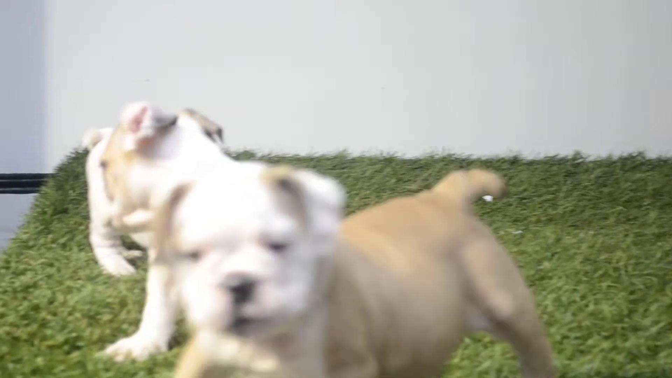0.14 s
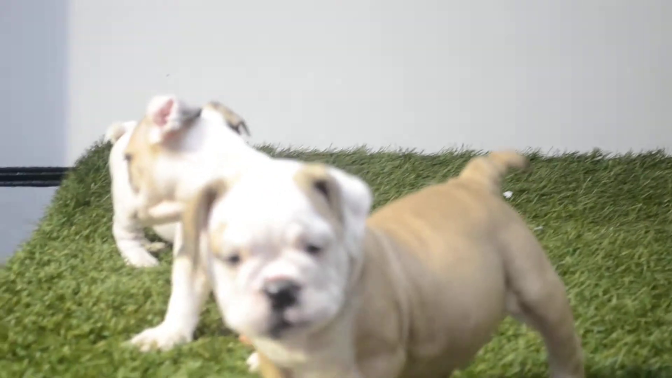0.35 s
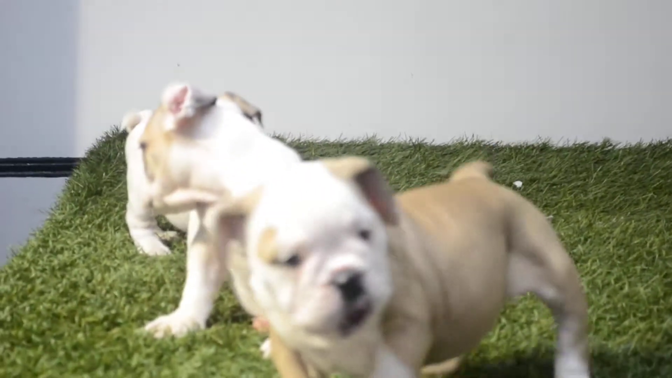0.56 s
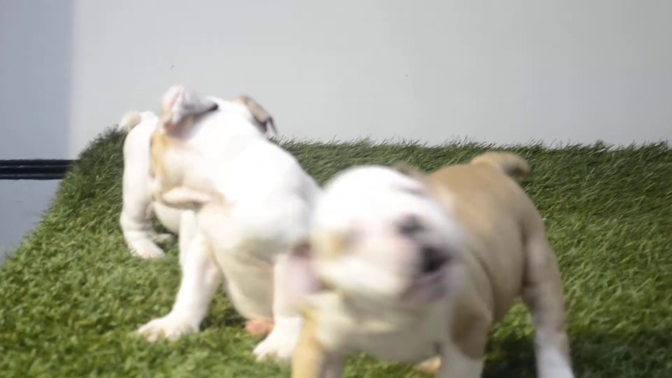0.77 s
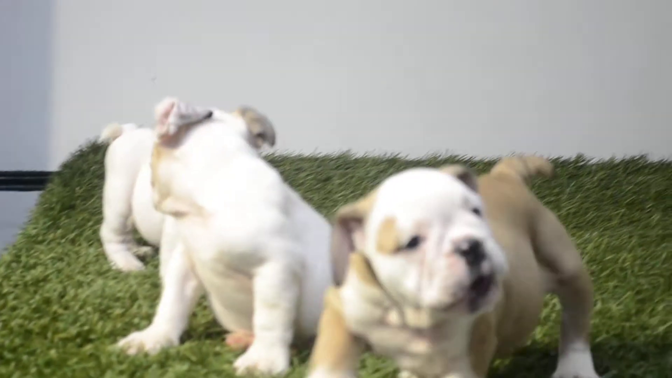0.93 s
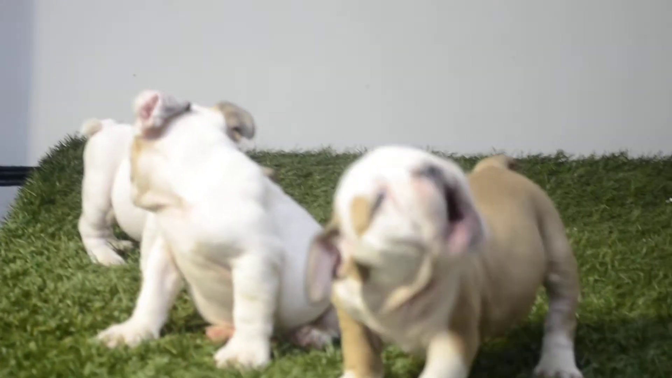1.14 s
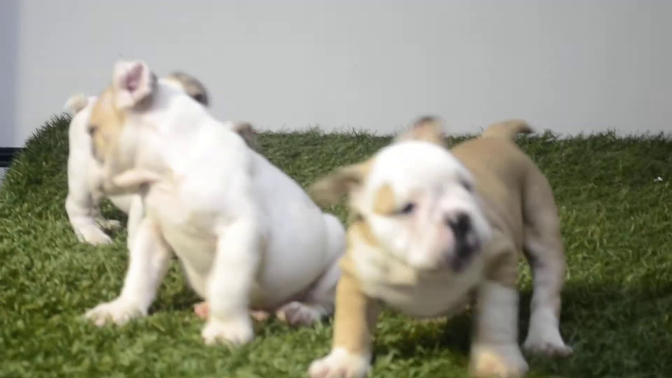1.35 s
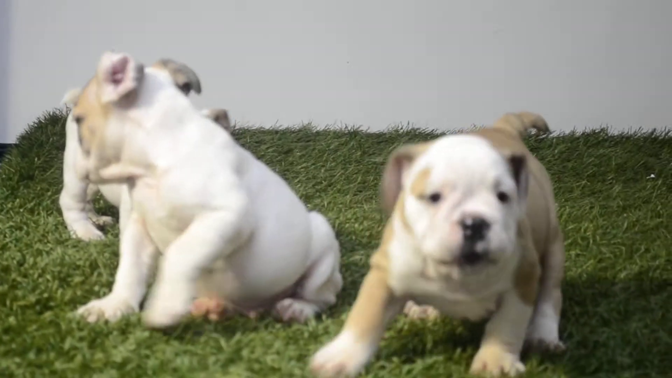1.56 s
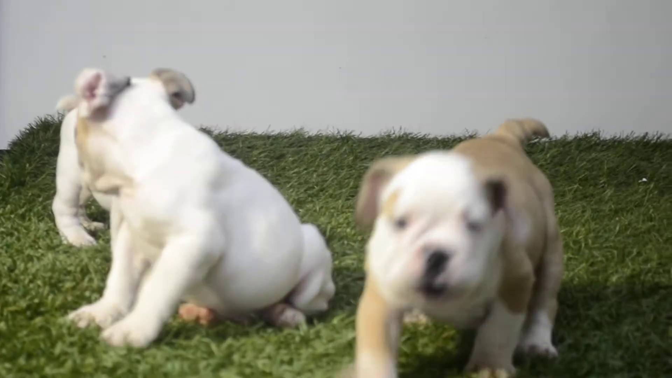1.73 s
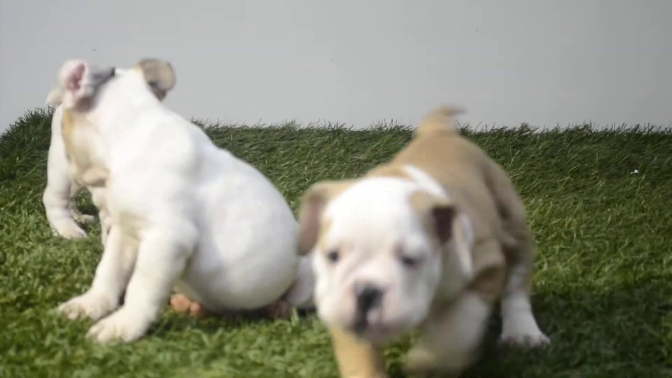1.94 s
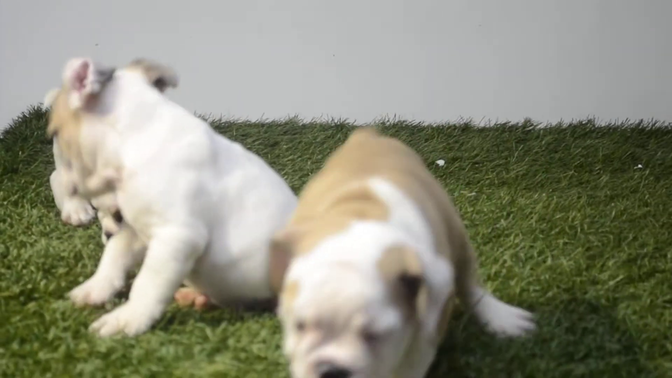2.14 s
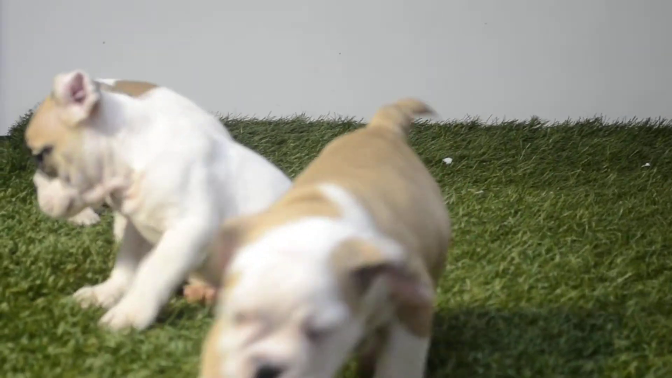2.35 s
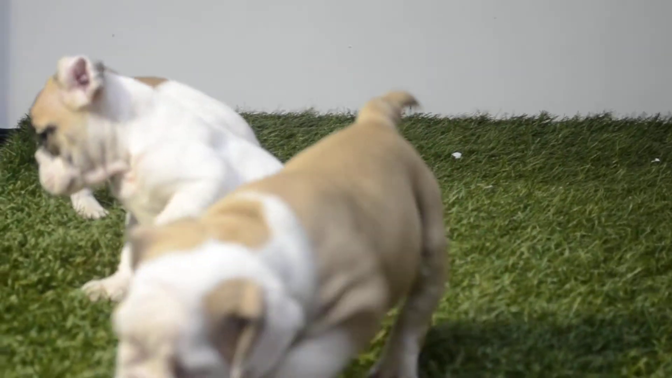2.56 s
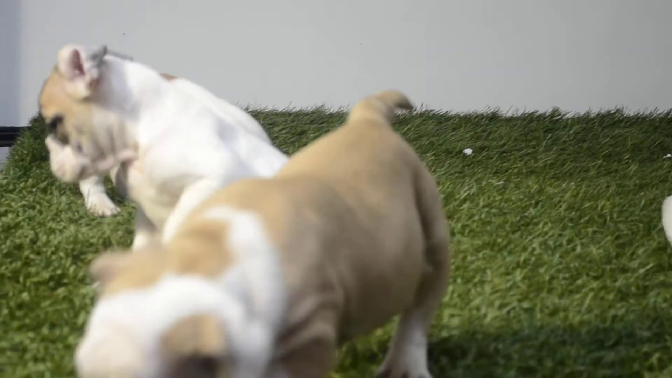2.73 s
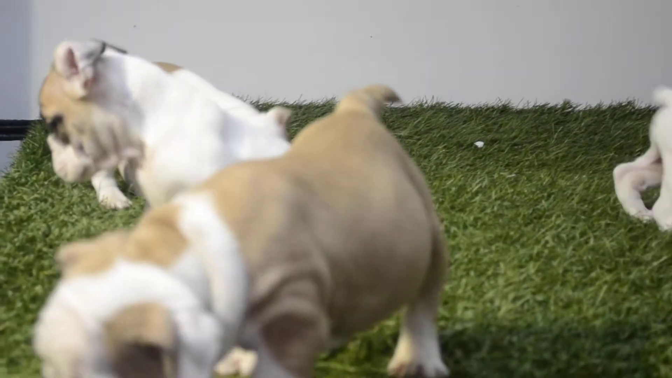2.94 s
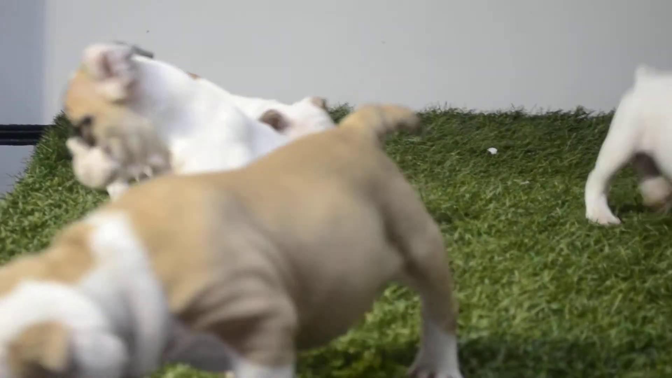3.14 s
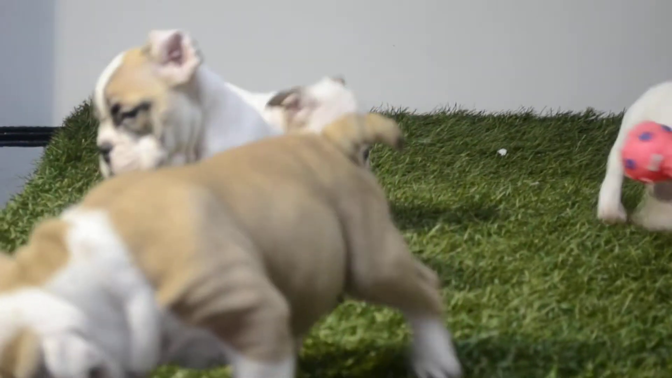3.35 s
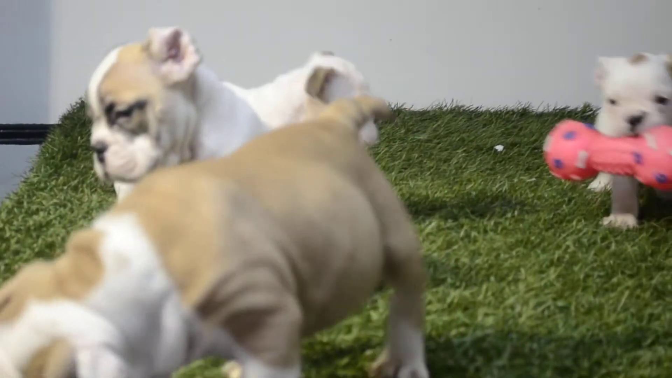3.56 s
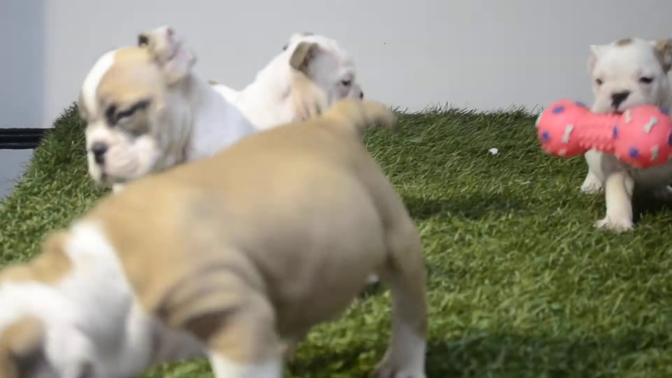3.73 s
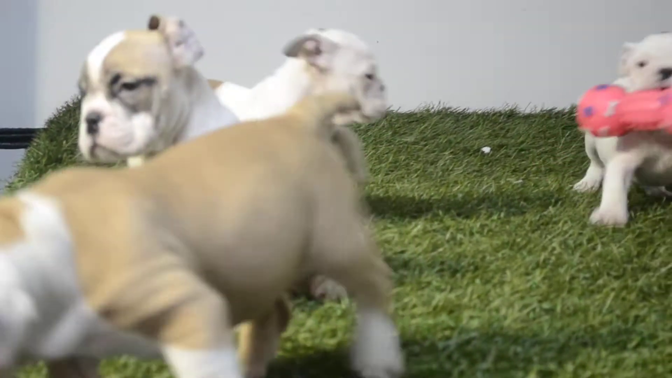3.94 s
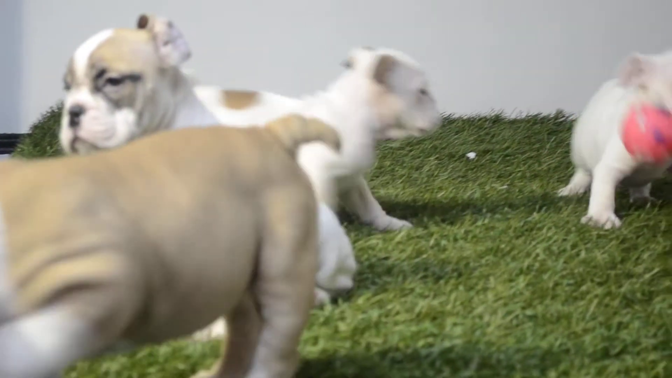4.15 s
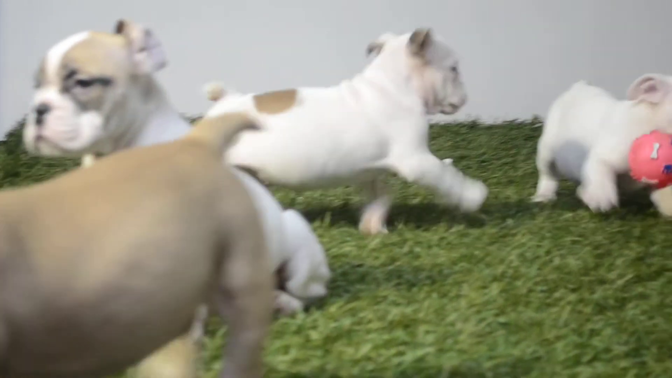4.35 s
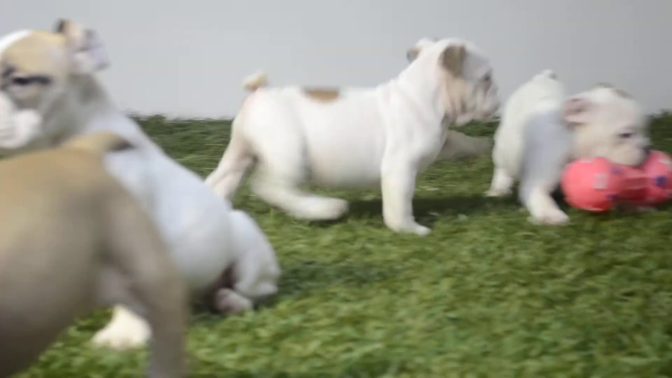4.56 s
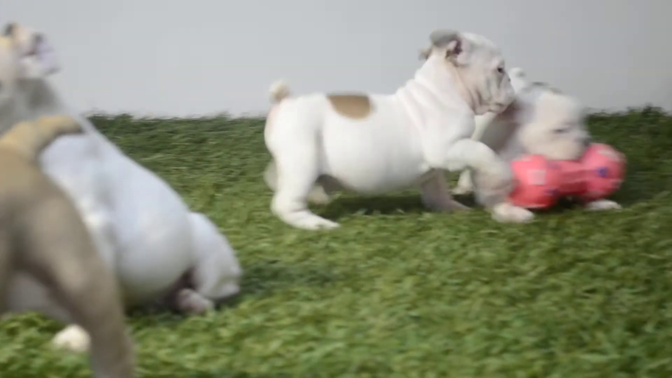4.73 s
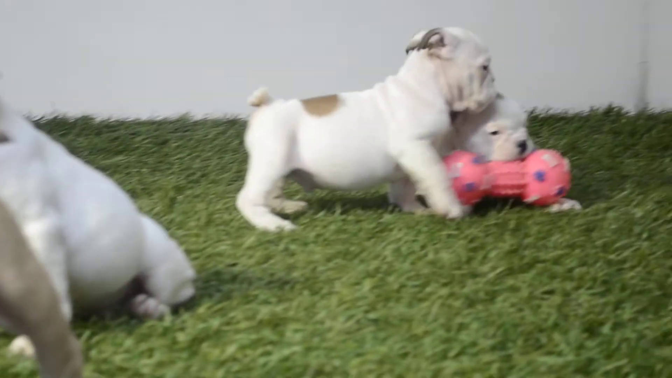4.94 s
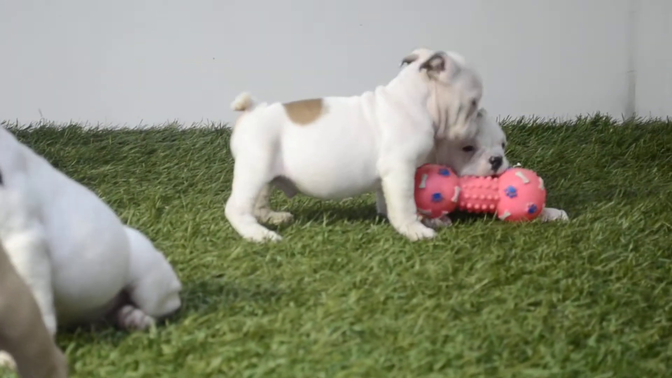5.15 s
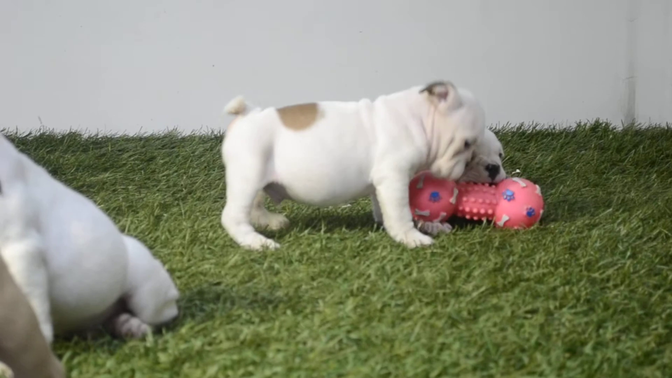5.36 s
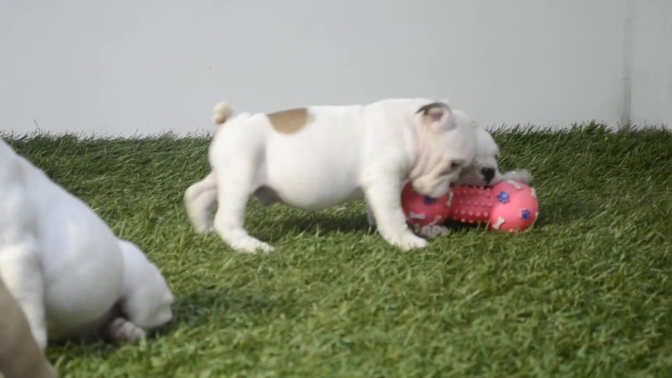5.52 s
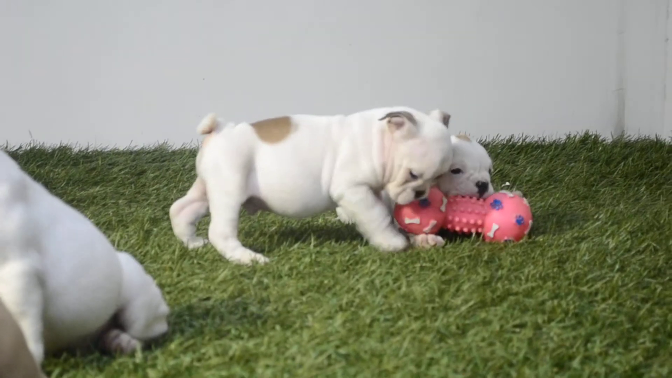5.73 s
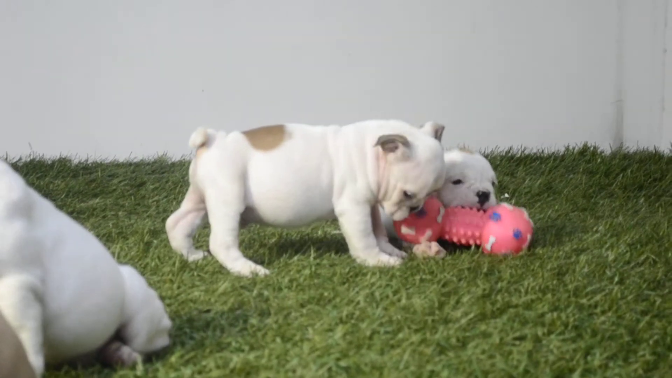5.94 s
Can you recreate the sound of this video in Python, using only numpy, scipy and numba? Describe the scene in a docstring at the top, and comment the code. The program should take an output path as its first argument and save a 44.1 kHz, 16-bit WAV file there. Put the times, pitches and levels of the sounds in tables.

```python
"""In a bare, echoing room, bulldog puppies play on artificial turf.
One gives two shrill hoarse yaps, a growling bark, a grumble and a last yap that falls as the mouth
closes. Each call is a string of uneven pulses from the vocal folds that make the throat ring.
Between the calls, air snuffles and whistles through short noses, and paws thud and brush the
plastic blades. Under it all lies a steady hiss with a faint whine."""
import sys
import numpy as np
from scipy import signal
from scipy.fft import rfft, irfft, next_fast_len
from scipy.io import wavfile
from scipy.ndimage import uniform_filter1d
from numba import njit

SR = 44100
rng = np.random.default_rng(int(sys.argv[2]) if len(sys.argv) > 2 else 0)


def to_wav(s):
    """Save 16-bit WAV."""
    ch = np.atleast_2d(s).T  # columns
    pcm = np.round(np.clip(ch, -1, 1) * 32767)  # PCM
    wavfile.write(sys.argv[1], SR, pcm.astype(np.int16))


N = 268569
TIME = np.arange(N) / SR


def yaps():
    """Three shrill calls that burst out at their loudest and soon turn hoarse."""
    # one breath per yap: (start [s], level [dB], attack [s], hold [s], sag over the hold [dB],
    # throb [dB], base pitch [Hz], roughness [0-1], mouth opening at the start [factor],
    # mouth opening at the end [factor], time the mouth takes to move [s])
    breaths = [(.656, -16.5, 0.016, 0.17, 4, 3.5, 536.7, 0.18, 1.23, 0.96, .05),
               (1.066, -16.5, .016, 0.18, 5, 5, 547.4, 0.34, 1.0, 0.97, 0.088),
               (4.287, -16.5, .027, 0.082, 3.5, 1.65, 328.6, .08, 1.24, .88, .061)]
    # where the throat rings in each yap: (centre [Hz], width [Hz], gain [dB], follows mouth [power])
    first_throat = [(1064, 314, 4.5, 0.82), (1244, 366, 2.5, 0.12), (2146, 240, 4.5, 0.78),
                    (2070, 380, -5.5, 0.34), (2995, 470, 2, 0.6)]
    second_throat = [(1147, 244, -1, 0.38), (1570, 260, -7, 0.2), (2223, 550, -10, 4.4),
                     (3150, 236, -7.5, 0.39)]
    last_throat = [(550, 220, -15, .5), (950, 430, -2.5, 1.3), (1460, 530, -9, -0.66),
                   (2694, 220, -4, 1.39), (3170, 425, -4, 0.89), (3860, 1100, -24, 0.35)]
    first, second, last = (
        breath(row, release_db_per_s=448, accent_db=4, accent_s=.052, roughens_per_s=1.6)
        for row in breaths)
    return (call(first, first_throat, low_cut_hz=650, jitter=.13)
            + call(second, second_throat, low_cut_hz=590, jitter=.12)
            + call(last, last_throat, low_cut_hz=376, jitter=.13))


def growls():
    """Slower, very uneven pulses: a grunt, a low growl, the bark it breaks into and a long grumble."""
    # one breath for each of the four, with the same columns as in yaps()
    breaths = [(1.596, -22, 0.0099, 0.013, 9, -1, 286, 0.28, 0.75, 0.77, 0.031),
               (1.64, -36.5, 0.026, 0.044, -7, 3.5, 144.4, 0.61, 0.81, .8, 0.11),
               (1.72, -16.5, .056, .076, 0, 1.7, 200.1, .48, .84, 1.03, .075),
               (2.208, -27, .041, 0.36, 12, 3.5, 101.6, 0.59, 1.254, .66, .19)]
    # where the throat rings: (centre [Hz], width [Hz], gain [dB], follows mouth [power])
    growl_throat = [(393, 890, -16, 0.96), (1010, 550, 2, 0.96), (1616, 490, -5.5, 1),
                    (2470, 710, -4.5, 0.22), (3520, 300, -3, 0.67)]
    grumble_throat = [(420, 740, -11.5, 0.95), (767, 280, -2, 0.69), (1125, 220, 0.5, 0.93),
                      (2020, 730, -10, 0.098), (3010, 2300, -15.5, 0.87)]
    *barks, grumble = (
        breath(row, release_db_per_s=897, accent_db=-3.5, accent_s=.016, roughens_per_s=.8)
        for row in breaths)
    barking = sum(call(bark, growl_throat, low_cut_hz=140, jitter=.52) for bark in barks)
    return barking + call(grumble, grumble_throat, low_cut_hz=63, jitter=.4)


def breath(row, release_db_per_s, accent_db, accent_s, roughens_per_s, throb_hz=26.37, slide_s=.03):
    """One push of breath swells, throbs and fades; the pitch follows the mouth and the voice frays."""
    start, db, attack, hold, sag_db, throb_db, pitch_hz, rough, mouth_from, mouth_to, move_s = row
    end = start + attack + hold + 40 / release_db_per_s   # until the release has dropped 40 dB
    span = np.flatnonzero((TIME >= start) & (TIME < end))
    age = TIME[span] - start
    held = age - attack
    throb = 2 * np.abs(np.cos(np.pi * throb_hz * np.maximum(held, 0))) ** 3.4   # short bursts
    throb -= throb.mean()
    level_db = db + 16 * np.minimum(held / attack, 0)   # the climb of the attack
    level_db += accent_db * np.exp(-np.abs(held / accent_s)) + throb_db * throb
    level_db -= sag_db * np.clip(held / hold, 0, 1) + release_db_per_s * np.maximum(held - hold, 0)
    mouth = mouth_to + (mouth_from - mouth_to) * np.exp(-(age / move_s) ** 2)
    slide = .5 + .5 * np.minimum(age / slide_s, 1) ** 2   # up from half the pitch
    # each throb lifts the pitch a little and clears the voice
    pitch = pitch_hz * slide * mouth ** .75 * (1 + .015 * throb)
    rough = (rough + (1 - rough) * roughens_per_s * age) * (1 - .3 * throb)
    return span, level_db, pitch, np.clip(rough, 0, 1), mouth


def call(motion, throat, low_cut_hz, jitter):
    """Uneven pulses of the vocal folds, each with a puff of air, ring the throat as the mouth moves."""
    # how the voice carries from muzzle to listener: (frequency [Hz], gain [dB])
    voice_colour = [(60, 0.5), (200, 6), (1000, 0), (3400, 1.5), (3750, -11.5), (4400, -6.5), (7000, -18),
                    (10000, -16), (12000, -32)]
    span, level_db, pitch, rough, mouth = motion
    cycles = np.cumsum(pitch * np.exp(jitter * rough * wander(350)[span])) / SR
    pulses = np.diff(np.floor(cycles), prepend=0) * from_db(7 * rough * wander(300)[span])
    puffs = rng.standard_normal(N)[span] * np.exp(-2 * (cycles % 1))
    source = np.sqrt(1 - rough) * rms_one(pulses) + np.sqrt(rough) * rms_one(puffs)
    voice = 0
    for hz, width, db, follows in throat:
        centre = hz * mouth ** follows
        voice += from_db(db) * resonate(resonate(source, centre, width), centre, width)
    # a small muzzle gives off little bass
    voice = signal.sosfilt(signal.butter(4, low_cut_hz, "high", fs=SR, output="sos"), voice)
    voice = coloured(voice, voice_colour)
    # even out the loudness, so that the breath sets it
    voice /= np.sqrt(np.abs(uniform_filter1d(voice ** 2, size=600)) + 1e-12)
    # fade in over the first two pulses, so that the call starts without a click
    fade_in = np.minimum(cycles / 2, 1)
    out = np.zeros(N)
    out[span] = voice * from_db(level_db) * fade_in
    return out


def snuffles():
    """Air forced through a short nose, fluttering a little in its soft folds."""
    # puffs of air: (peak time [s], level [dB], rise [s], fall [s], nose hiss against the air [dB])
    puffs = [(1.018, -23.5, 0.015, 0.072, -17.5), (2.032, -37.5, 0.03, 0.016, -12.5),
             (2.25, -39.5, .21, 0.17, -13.5), (3.111, -29, 0.049, 0.043, -15.5),
             (3.88, -35.5, 0.046, 0.022, -10.5), (4.21, -38.5, .051, 0.039, -15),
             (5.053, -22.5, 0.0068, 0.061, -15), (5.235, -38.5, .005, 0.021, -1),
             (5.73, -41, .032, 0.084, -9.5), (6.05, -43, .064, .055, -9)]
    # tone of the rushing air and of the high nose hiss: (frequency [Hz], gain [dB])
    air_colour = [(30, -44), (150, -17), (300, -9), (700, -13), (1000, -2), (1400, -12.5), (2000, 3.5),
                  (2700, 2.5), (3400, 0), (4300, -20.5), (7000, -41.5), (12000, -66.5)]
    nose_colour = [(1000, -24), (3000, 3.5), (4200, 13), (6600, -1.5), (8000, -12.5), (10000, -21),
                   (11200, -38), (13000, -61)]
    air = rms_one(coloured(rng.standard_normal(N), air_colour))
    nose = rms_one(coloured(rng.standard_normal(N), nose_colour))
    blown = sum(from_db(db) * swell(s, rise, fall) * (air + from_db(nose_db) * nose)
                for s, db, rise, fall, nose_db in puffs)
    return blown * from_db(1.2 * wander(130))


def nose_whistle(width_hz=45):
    """Air sings in the nostrils: one thin whistle with weaker tones above it."""
    # the whistle: (time [s], level [dB], pitch [Hz])
    whistle_curve = [(2.1, -88, 3190), (2.14, -43, 3190), (2.27, -43, 3144), (2.315, -27, 3150),
                     (2.345, -41, 3080), (2.42, -73, 3170)]
    # the weaker tones: (pitch [Hz], peak level [dB])
    upper_tones = [(3740, -42), (4640, -52.5), (5500, -61), (6900, -67)]
    air = rng.standard_normal(N)
    tones = 0
    for hz, db in upper_tones:
        centre = np.full(N, float(hz))
        tones += from_db(db) * rms_one(resonate(resonate(air, centre, width_hz), centre, width_hz))
    return tones * swell(2.36, rise=.19, fall=.086) + trembling_tone(whistle_curve, waver=.015)


def squeak():
    """A brief high squeak that dies away."""
    # its course: (time [s], level [dB], pitch [Hz])
    squeak_curve = [(0, -31.5, 1740), (.02, -36.5, 1817), (.07, -60, 1700)]
    return trembling_tone(squeak_curve, waver=.011)


def paws(rise_s=.0062):
    """Each step on the turf gives a dull thud and a crackle of plastic blades."""
    # the firmer steps: (time [s], level [dB], thud pitch [Hz], fall [s])
    firm_steps = [(.005, -40, 1070, .049), (.095, -40, 560, 0.036), (.135, -45, 910, 0.031),
                  (.2, -44.5, 258, 0.13), (.56, -39.5, 330, .015), (1.54, -37, 950, 0.019),
                  (2.57, -36, 238, 0.051), (2.978, -39, 970, 0.035), (3.09, -41.5, 1034, 0.1),
                  (3.413, -41, 214, 0.028), (4.129, -49, 950, 0.011), (4.24, -48.5, 210, 0.085),
                  (4.956, -36, 1740, 0.075), (5.204, -39.5, 525, 0.11), (5.772, -40.5, 233, 0.024)]
    # tone of the blades: (frequency [Hz], gain [dB])
    blade_colour = [(40, -42), (300, 2), (1000, -7.5), (3200, -0.5), (4500, -15.5), (8000, -39.5),
                    (12000, -53)]
    crackle = rng.standard_normal(N) * from_db(10 * wander(700))
    blades = rms_one(coloured(crackle, blade_colour))
    thud_band = signal.butter(2, [130, 2000], "band", fs=SR, output="sos")
    push = signal.sosfilt(thud_band, rng.standard_normal(N))
    out = np.zeros(N)
    for s, db, hz, fall in list(firm_steps) + light_steps():
        span = slice(max(int(s * SR) - SR // 20, 0), int(s * SR) + SR // 2)
        centre = np.full(len(push[span]), float(hz))
        thud = rms_one(resonate(push[span], centre, .38 * hz))
        rustle = from_db(-3 + 3 * np.log2(hz / 1000)) * blades[span]   # low, flat steps crackle less
        out[span] += from_db(db) * swell(s, rise_s, fall, TIME[span]) * (thud + rustle)
    return out


def light_steps(steps_per_s=13, low_hz=464, high_hz=1090, fall_s=.037):
    """Small shuffling steps at an uneven pace, in rows like those of the firm ones."""
    # how hard the paws shuffle: (time [s], level [dB])
    shuffle_level = [(0, -64), (.3, -37.5), (.6, -56), (3.7, -56), (4.0, -47), (4.7, -40.5), (5.4, -55),
                     (6.09, -47.5)]
    count = int(steps_per_s * N / SR)
    late, strength, tone = rng.random((count, 3)).T
    times = (np.arange(count) + late) / steps_per_s
    levels = np.interp(times, *np.transpose(shuffle_level)) + 6 * (strength - .5)
    pitches = low_hz * (high_hz / low_hz) ** tone
    return [(*step, fall_s) for step in zip(times, levels, pitches)]


def room(x, first_echo_s=.0053, build_up_s=.0019):
    """Dense echoes off bare walls, dying at their own rate in each octave."""
    # how long the echoes last: (frequency [Hz], time to fade by 60 dB [s])
    fade_times = [(150, 1), (800, 0.61), (2200, 0.81), (5000, 0.68), (10000, 0.1)]
    t = TIME[:SR]
    echoes = rfft(rng.standard_normal(SR))
    octave = np.round(np.log2(np.maximum(np.fft.rfftfreq(SR, 1 / SR), 125)))
    tail = sum(irfft(echoes * (octave == k), SR) * from_db(-60 * t / at_hz(fade_times, 2 ** k))
               for k in np.unique(octave))
    response = rfft(tail * (1 - np.exp(-t / build_up_s)))
    # smooth the random peaks and dips of the echoes, so that they sound even in tone
    power = uniform_filter1d(uniform_filter1d(np.abs(response) ** 2, size=40), size=40)
    tail = irfft(response / np.sqrt(power), SR)[:SR * 3 // 4]
    tail = np.concatenate([np.zeros(int(first_echo_s * SR)), tail])
    return signal.fftconvolve(x, tail / np.sqrt(np.sum(tail ** 2)))[:N]


def background(hiss_db=-43):
    """A steady hiss with a faint whine that comes and goes."""
    # tone of the hiss: (frequency [Hz], gain [dB])
    hiss_colour = [(25, -41.5), (55, -16), (85, -11.5), (200, -4), (400, -4), (900, -3.5), (2100, 0.5),
                   (3200, 0), (4000, -11), (5100, -18.5), (7200, -31), (8200, -41.5), (10300, -44.5),
                   (11500, -66)]
    # tones of the whine: (pitch [Hz], level before the boost [dB])
    whine_tones = [(1200, -71.5), (1319, -67), (1561, -68), (2159, -67), (2756, -66)]
    # its slow ebb and swell: (time [s], boost [dB])
    whine_boost = [(0, 11.5), (2.8, 9), (3.6, 8), (4.2, 9.5), (5.2, 12.5), (6.09, 12)]
    hiss = from_db(hiss_db) * rms_one(coloured(rng.standard_normal(N), hiss_colour))
    whine = sum(from_db(db + 2 * wander(1.07)) * np.sin(2 * np.pi * hz * TIME) for hz, db in whine_tones)
    boost = from_db(np.interp(TIME, *np.transpose(whine_boost)))
    return hiss + np.sqrt(2) * boost * whine


def trembling_tone(curve, waver):
    """An almost pure tone with a shaky pitch, following rows of (time [s], level [dB], pitch [Hz])."""
    times, levels, pitches = np.transpose(curve)
    span = np.arange(int(times[0] * SR), int(times[-1] * SR))
    gain = from_db(np.interp(span / SR, times, levels))
    hz = np.interp(span / SR, times, pitches) * (1 + waver * wander(400)[span])
    out = np.zeros(N)
    out[span] = np.sqrt(2) * gain * np.sin(2 * np.pi * np.cumsum(hz) / SR)
    return out


@njit
def resonate(x, hz, width):
    """Make a sound ring around a frequency that may move; a smaller width rings longer."""
    y, r = np.zeros(len(x)), np.exp(-np.pi * width / SR)
    for i in range(2, len(x)):
        drive = (1 - r * r) / 2 * (x[i] - x[i - 2])
        y[i] = drive + 2 * r * np.cos(2 * np.pi * hz[i] / SR) * y[i - 1] - r * r * y[i - 2]
    return y


def swell(peak_s, rise, fall, t=TIME):
    """A loudness curve that grows to 1 at its peak and dies away."""
    return np.exp(np.maximum(np.minimum((t - peak_s) / rise, (peak_s - t) / fall), -30))


def wander(rate):
    """A random drift of size about 1 that turns `rate` times a second."""
    return np.interp(TIME * rate, np.arange(N), rng.standard_normal(N))


def coloured(x, spectrum):
    """Shape a sound's tone by a table of (frequency [Hz], gain [dB])."""
    size = next_fast_len(len(x) + 4096)
    gain = from_db(at_hz(spectrum, np.fft.rfftfreq(size, 1 / SR)))
    return irfft(rfft(x, size) * gain, size)[:len(x)]


def at_hz(points, hz):
    """Read between the rows of a frequency table, with octaves evenly spaced."""
    knots, values = np.transpose(points)
    return np.interp(np.log(hz + 1e-3), np.log(knots), values)


def from_db(db):
    """Turn decibels into a gain."""
    return 10 ** (np.asarray(db) / 20)


def rms_one(x):
    """Scale a sound to an average power of 1."""
    return x / np.sqrt(np.mean(x ** 2) + 1e-20)


def scene():
    """The calls fill the room; the small noises of play echo less."""
    calls = yaps() + growls()
    play = snuffles() + nose_whistle() + squeak() + paws()
    echoes = room(calls + from_db(-3) * play)
    return (calls + play + echoes + background())[None]


def record(dry, ceiling=.68, cutoff_hz=15800):
    """The loudest peaks overload and flatten; the highest treble is cut."""
    clipped = dry / (1 + (dry / ceiling) ** 12) ** (1 / 12)
    return signal.sosfilt(signal.cheby2(12, 70, cutoff_hz, fs=SR, output="sos"), clipped)


dry = scene()
out = record(dry)
to_wav(out)
```